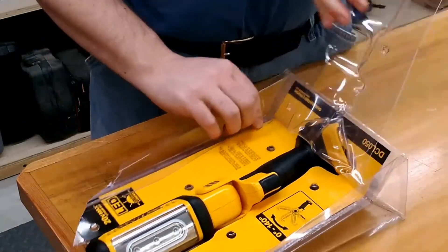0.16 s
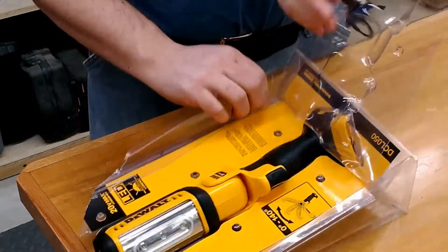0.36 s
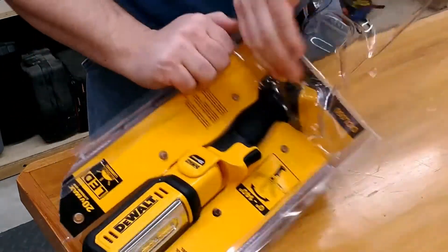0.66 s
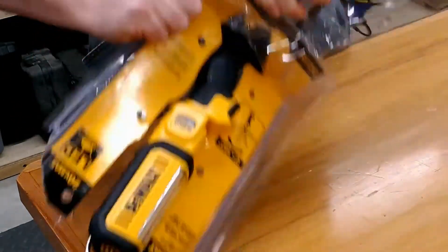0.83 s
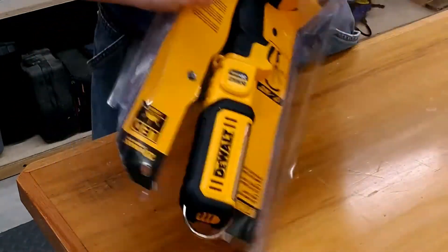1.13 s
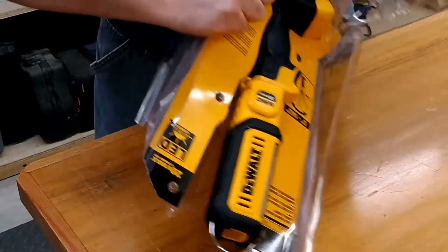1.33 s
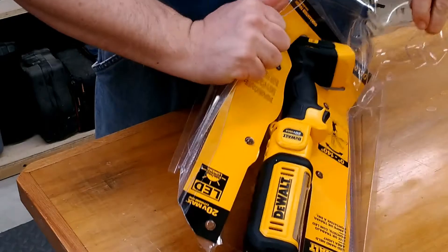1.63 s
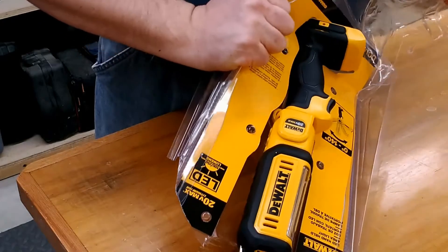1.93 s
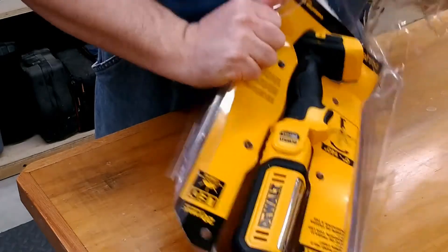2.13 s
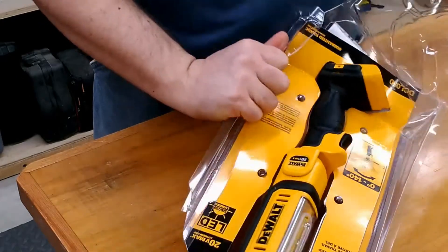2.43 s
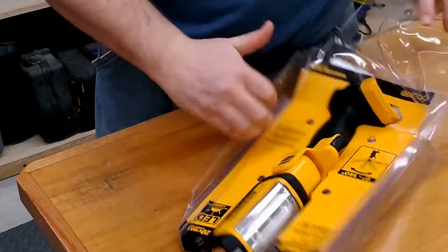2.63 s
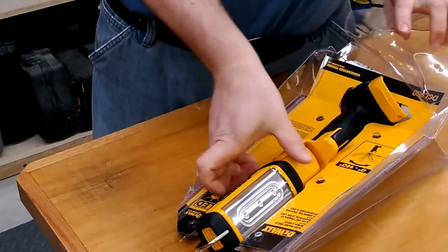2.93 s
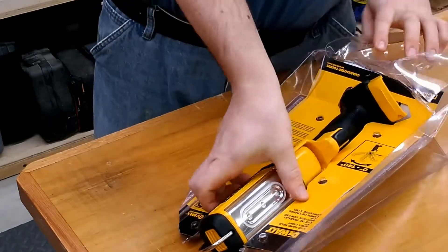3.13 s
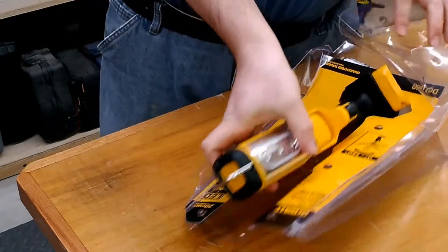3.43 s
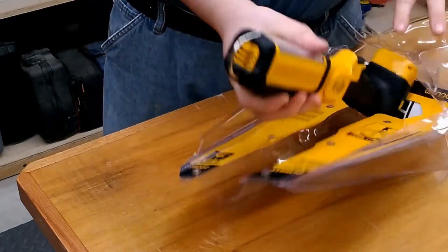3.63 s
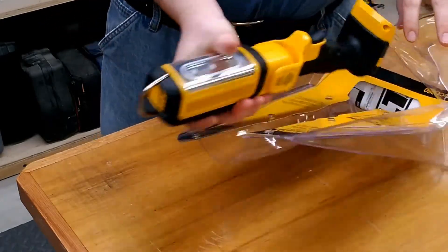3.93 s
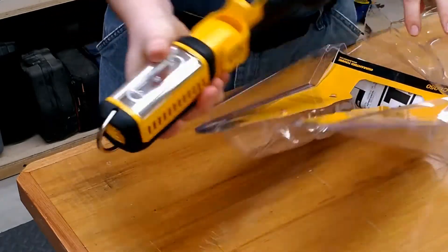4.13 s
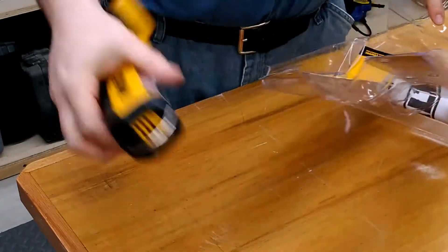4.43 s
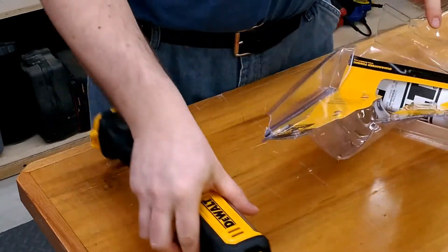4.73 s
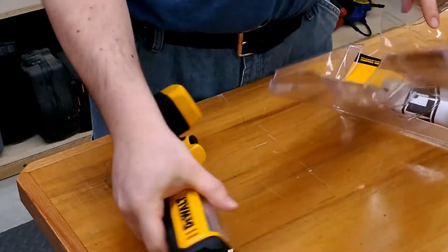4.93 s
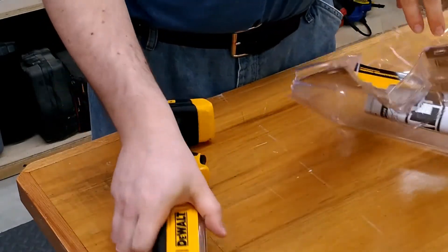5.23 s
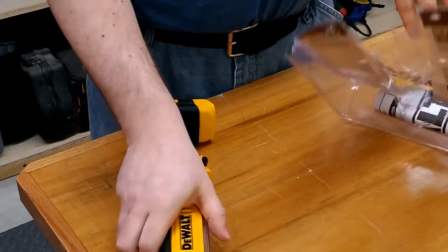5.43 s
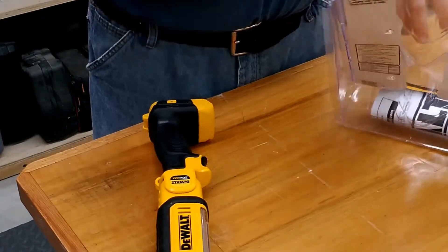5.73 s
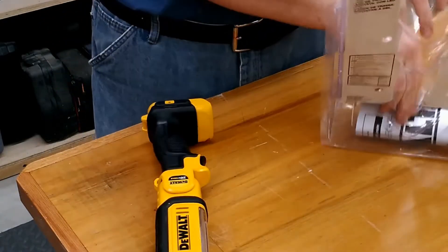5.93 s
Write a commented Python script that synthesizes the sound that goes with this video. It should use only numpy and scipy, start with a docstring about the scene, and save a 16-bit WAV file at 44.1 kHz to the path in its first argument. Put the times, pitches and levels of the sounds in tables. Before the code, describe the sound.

Close, bright plastic buckling and rustling, a brief sliding rush, then dull wooden knocks with sharp snaps in a small workshop.

```python
"""On a wooden bench in a workshop, hands pull open stiff clear plastic packaging: panels buckle with snaps and
pops (short modes) over a fine rustle (shaped grainy noise) and crackle (tiny rings), loudest in the first half.
Past the middle the empty shell slides over the bench with a soft rush of noise. Then a heavy lamp is set down
with dull knocks (bench modes) among more snaps, and a few last buckles and rustles end the scene.
Bench tremble and quiet background noise run throughout; the room answers snaps and knocks; a close stereo pair listens."""
import sys
import numpy as np
from scipy import signal
from scipy.fft import rfft, irfft, next_fast_len
from scipy.io import wavfile
from scipy.ndimage import uniform_filter1d, map_coordinates

SR = 44100
rng = np.random.default_rng(int(sys.argv[2]) if len(sys.argv) > 2 else 0)


def digitize_waveform(pressure):
    """Quantize a signal to 16-bit integers and store it at the path in sys.argv[1].

    Rows of a 2-D input are taken as channels; values are limited to [-1, 1].
    """
    field = np.atleast_2d(pressure).T
    bounded = np.clip(field, -1, 1)
    quanta = np.round(bounded * 32767).astype(np.int16)
    wavfile.write(sys.argv[1], SR, quanta)


N = 267687

# panels buckling: (time [s], relative level [dB], panel pitch [Hz], rib pitch [Hz],
# depth [dB], brightness [dB], relative room level [dB])
BUCKLES = [(0.031, -45.5, 950, 1670, -35, -1, 17.5), (0.063, -25, 550, 2800, 4.5, 11, 8.5),
           (0.106, -13.5, 372, 1310, 8.5, -19.5, 2), (0.138, -22.5, 358, 2650, 8, -23, 2.5),
           (0.378, -25, 610, 2950, 1, 17, 3.5), (0.489, -37, 1140, 1760, 1, -8, 4.5),
           (0.53, -31.5, 800, 1610, 8, -1.5, 12), (0.553, -27.5, 410, 1060, -9, -11.5, 2),
           (0.626, -27.5, 190, 3300, -7, -1, 7), (0.694, -33, 1090, 1420, -45, -1, 2),
           (0.787, -25, 374, 1530, 3, 8, 5), (0.829, -19, 383, 2610, 3.5, -1.5, -1),
           (0.884, -38, 326, 3260, 1, 12, -10), (0.944, -48.5, 720, 1910, 0, -10, -8),
           (1.038, -29.5, 745, 1290, -16, -86, 0), (1.074, -30.5, 456, 1340, 25, -56, -2.5),
           (1.124, -22.5, 805, 1850, -13, 3, -3), (1.148, -30, 740, 400, -16, -40, 5.5),
           (1.237, -32.5, 645, 3030, -10, -48, -4), (1.303, -27, 613, 3300, -31.5, 3, 10),
           (1.341, -28, 960, 3230, -32, -2, 5.5), (1.406, -12, 457, 1460, 4.5, -4.5, 0),
           (1.438, -11, 424, 2850, 5.5, 11, 1), (1.448, -4.5, 1260, 1614, -13, -5.5, -1),
           (1.523, -20.5, 1980, 3070, -3, -4, 4.5), (1.554, -26, 2530, 3300, -9, 0.5, -1),
           (1.641, -13.5, 1060, 1380, -5.5, 1, 0.5), (1.686, -25, 440, 673, 2, -35, 0),
           (1.694, -14, 657, 3260, -5, 14, 0), (1.744, -16.5, 950, 2820, 3, 10, 1),
           (1.77, -18, 980, 3000, 5, 9, 1.5), (1.895, -11.5, 525, 1430, -10, -28.5, 1.5),
           (1.999, -25.5, 430, 1360, -3.5, -25, 2.5), (2.124, -37, 1340, 3220, -5, 11, 10),
           (2.21, -24.5, 1260, 2000, 3, 8, 8), (2.297, -22.5, 556, 3030, -24, -52, 2.5),
           (2.387, -23, 406, 1780, -3, -24, -2.5), (2.431, -35, 2270, 3200, -10, -8, -9),
           (2.469, -1, 558, 1250, -15.5, -31.5, 0), (2.562, 4.5, 1060, 2440, -26, -8, 4.5),
           (2.65, -1, 568, 1720, -9.5, -34, 1), (2.956, -49.5, 1170, 1210, -11.5, -14, -1.5),
           (3.0, -27, 855, 2100, -16.5, -36.5, 8.5), (3.065, -25, 606, 2690, -28, -35, 1.5),
           (3.098, -32, 186, 1240, 4, -74, -11), (3.14, -33.5, 593, 1710, -16, 3, -1.5),
           (3.2, -27.5, 305, 614, 1, -61, -2.5), (3.262, -43, 595, 3000, -3.5, -25, -2),
           (3.312, -36, 430, 800, 1, -58, 0.5), (3.335, -40, 2500, 3280, -14, 8, 1),
           (3.364, -31, 184.6, 376, 29, -33, -10), (3.384, -25, 610, 1500, -14, 5, 1.5),
           (3.392, -27.5, 612, 1460, -25, -51, -2), (3.462, -19, 560, 2360, -7, -11.5, 1.5),
           (3.516, -34.5, 700, 2730, -45, -58, -5), (3.543, -30.5, 707, 3060, -11, -37, -3),
           (3.578, -23.5, 377, 1510, 3, -20, 4.5), (3.654, -29.5, 610, 1470, -9.5, -29, 6.5),
           (3.668, -16, 1030, 2100, -1.5, -37, 1), (3.751, -21, 677, 2470, -8, -17.5, -0.5),
           (3.798, -19.5, 550, 1480, 9, -91, 2), (4.411, -14, 957, 2570, -24, -16.5, 5),
           (5.097, -14, 1010, 1546, -13, -45, 6.5), (5.113, -4.5, 1080, 2730, -21, -22.5, 3.5),
           (5.121, -8, 458, 628, -9.5, -44, -2.5), (5.139, -20, 960, 1300, -24, 1, 13),
           (5.161, -3, 1150, 1914, -17, 1.5, 2), (5.176, -7.5, 471, 2850, -25, -8, 0.5),
           (5.844, -38, 1080, 1354, 6, -33, 5), (5.862, -33.5, 883, 1260, -34, -18, 18),
           (5.928, -25.5, 1290, 2640, -25, -23, 7.5), (5.968, -21.5, 1080, 1710, -41, -10, 9),
           (6.006, -24, 750, 2930, -20, -6, 9)]
# hands working the sheets: (time [s], relative low rub level [dB], relative rustle level [dB])
HANDLING = [(0.0, -61, -65.5), (0.18, -59, -89), (0.43, -63.5, -63), (0.55, -62, -46), (0.9, -119, -118),
            (1.1, -47, -68), (1.2, -52, -57.5), (1.5, -40, -53), (1.72, -47, -50), (2.01, -62, -92),
            (2.182, -59, -43), (2.35, -100.5, -50), (2.602, -31, -29), (2.831, -38, -53.5),
            (3.019, -69, -74), (3.22, -58, -79), (3.42, -50, -72), (3.55, -59, -51), (3.7, -42.5, -53),
            (3.9, -78, -84), (4.85, -82.5, -95), (5.06, -47.5, -72), (5.27, -35.5, -45),
            (5.801, -66.5, -94), (5.87, -46, -52), (6.04, -63, -30.5)]
# spectrum of the stiff sheet, also of the lamp's edge: (frequency [Hz], level [dB])
SHEET_SPECTRUM = [(500, -48), (1000, -8.5), (1600, -2), (2700, -4.5), (3500, -3.5), (4500, -22.5),
                  (7000, -51.5)]


def snaps(count=90, rise_s=.0025, lag_s=.00005, spread_s=0.000092,
          main_db=12, main_width=.1, small_db=-12, scatter_cycles=0.92):
    """Each buckle kicks fresh short modes in folds of every size, boosted near the panel and rib pitches."""
    # ringing by fold size: (frequency [Hz], t60 away from the main pitches [s], base level [dB],
    # share of depth [dB/dB], share of brightness [dB/dB])
    folds = [(290, 0.09, 0, 0.9, 0.05), (700, 0.036, 2, 0.061, 0.032), (2110, 0.018, 5, 0.028, 0.53),
             (6370, 0.015, 5.5, 0.021, 0.9), (13000, 0.026, 5.5, 0.2, 1.2)]
    out = np.zeros((2, N + SR))
    t = np.arange(SR // 16) / SR
    fold_hz, fold_t60_s, fold_db, deep, bright = np.transpose(folds)
    for s, db, panel_hz, rib_hz, depth_db, bright_db, room_db in BUCKLES:
        pitch, phase, size = rng.random((3, count, 1))
        hz = 150 * 95 ** ((np.arange(count)[:, None] + pitch) / count)
        main = sum(np.exp(-(np.log(hz / centre_hz) / main_width) ** 2) for centre_hz in (panel_hz, rib_hz))

        tilted_db = fold_db + deep * depth_db + bright * bright_db
        level_db = along(np.transpose([fold_hz, tilted_db]), hz) + 6 * size + main_db * main
        # the shell is too small to radiate deep bass
        level_db += small_db * np.log2(np.maximum(260 / hz, 1)) * (1 - main)

        t60_s = along(np.transpose([fold_hz, fold_t60_s]), hz) * (1 + 0.6 * main)
        decay_db = -60 * np.maximum(t - rise_s, 0) / t60_s
        # each snap swells over rise_s, then decays
        swell = np.minimum(t / rise_s, 1) ** 4 * amp(level_db + decay_db)

        # each mode radiates from its own part of the sheet
        mode_lag_s = lag_s + spread_s * rng.standard_normal((count, 1))
        pair = []
        for side in (-.5, .5):
            cycles = hz * (t - rise_s + side * mode_lag_s) + scatter_cycles * phase
            pair.append(np.sum(swell * np.sin(2 * np.pi * cycles), axis=0))
        pair = np.array(pair)
        add(out, s, amp(db - 2.76) * pair / np.abs(pair).max(), room_db - 2.5, octaves=0.69)
    return out[:, :N]


def rustle(spiky_db=6, wet_db=9.5, patchy_db=3.0):
    """Dense uneven creases come in clumps and blur in the room to a grainy rush; each snap stirs them up."""
    # spectra: (frequency [Hz], level [dB])
    rub_spectrum = [(120, -15.5), (250, -10), (500, 3.5), (900, -12), (1600, -18), (3000, -69)]
    hiss_spectrum = [(3000, -42.5), (4500, -5.5), (5600, 3), (7500, -3), (10000, -4.5), (14000, -6),
                     (15500, -40.5)]
    # stirring after a snap, relative to the snap, one entry each for rub, rustle, hiss: (level [dB])
    settle_levels_db = [-44, -36.5, -42.5]
    # in the same order: (share of the snap's brightness [dB/dB])
    settle_bright = [-0.24, 0.29, 0.6]
    settle_t60_s = .3
    # relative hiss level at a middling rustle; that rustle level; dB of hiss per dB of rustle
    hiss_mid_db, rustle_mid_db, hiss_growth = -54.5, -56, 0.71

    t = np.arange(N) / SR
    out = 0
    s, rub_db, sheet_db = np.transpose(HANDLING)
    hiss_db = hiss_mid_db + hiss_growth * (sheet_db - rustle_mid_db)
    snap_s, snap_db, *_, bright_db, _ = np.transpose(BUCKLES)
    layers = zip((rub_spectrum, SHEET_SPECTRUM, hiss_spectrum), (rub_db, sheet_db, hiss_db),
                 settle_levels_db, settle_bright)
    for spectrum, level_db, settle_db, share in layers:
        kicks = np.bincount(np.round(snap_s * SR).astype(int), amp(snap_db + share * bright_db), N)
        stirred = signal.lfilter([1], [1, -amp(-60 / (settle_t60_s * SR))], kicks)
        clumps = map_coordinates(rng.standard_normal(N // 600 + 4), [np.arange(N) / 600])

        creases = (rng.random((2, N)) < .02) * rng.standard_normal((2, N))
        creases *= amp(spiky_db * rng.standard_normal(N).clip(-2, 2))
        grainy = diffuse(unit(creases) + amp(wet_db) * rng.standard_normal((2, N)))
        colour = unit(filtered(grainy, lambda hz: amp(along(spectrum, hz))))

        level = amp(np.interp(t, s, level_db) - 6.5) + amp(settle_db) * stirred
        out = out + colour * level * amp(patchy_db * clumps)
    return out


def crackle(count=1600, centre_hz=2800, spread_oct=0.48, cycles=4, level_db=4, uneven_db=1.0, lag_s=0.00024):
    """Single small creases pop out of the rustle, each a brief ring at its own pitch and place."""
    when, colour, size, place = rng.random((count, 4)).T[..., None]
    octave = spread_oct * np.log(colour / (1 - colour)) / 2
    hz = centre_hz * 2 ** octave.clip(-2.5, 2)
    s, _, sheet_db = np.transpose(HANDLING)
    t = np.arange(SR // 50) / SR
    start_s = when * N / SR
    peak = amp(np.interp(start_s, s, sheet_db) + level_db - uneven_db * np.log(size + 0.027))
    at = (np.round(start_s * SR).astype(int) + np.arange(len(t))).ravel()
    envelope = peak * amp(-60 * t * hz / (np.e * cycles)) * np.minimum(t * hz, 1)
    pair = []
    for side in (-1, 1):
        ring = envelope * np.sin(2 * np.pi * hz * (t + side * lag_s * (place - .5)))
        pair.append(np.bincount(at, ring.ravel(), N + SR)[:N])
    return np.array(pair)


def swish(patchy_db=1.5):
    """The empty shell slides over the bench: a soft rush, uneven as the contact changes."""
    # slide envelope: (time [s], level [dB])
    slide_level = [(4.13, -85), (4.16, -76.5), (4.272, -49.5), (4.396, -65.5), (4.402, -62)]
    # slide spectrum: (frequency [Hz], level [dB])
    slide_spectrum = [(200, -10.5), (550, -0.5), (800, -7.5), (1050, -14.5), (1600, -19.5), (2700, -5.5),
                      (3700, -18.5), (4600, -21.5), (5700, -11.5), (7500, -22.5), (14000, -35.5)]
    s, db = np.transpose(slide_level)
    grip = map_coordinates(rng.standard_normal(N // 500 + 4), [np.arange(N) / 500])
    noise = diffuse(rng.standard_normal((2, N)))
    rush = unit(filtered(noise, lambda hz: amp(along(slide_spectrum, hz))))
    return rush * amp(np.interp(np.arange(N) / SR, s, db, -150, -150) + patchy_db * grip)


def knocks():
    """The lamp's weight rings the bench top, most near the pitch of the spot it lands on; its hard edge ticks."""
    # lamp landings: (time [s], relative level [dB], spot pitch [Hz], upper modes [dB], tick [dB],
    # relative room level [dB])
    landings = [(4.751, -37.5, 300, -8, -45.5, 10), (4.983, -24.5, 163.4, -11.5, -27.5, 1.5),
                (5.038, -26, 240, -33, -36, -3.5), (5.3, -31, 303, -6.5, -17, 7),
                (5.39, -37, 314, -4, -17, -0.5), (5.434, -43.5, 300, -18, -38, 1.5),
                (5.534, -34.5, 295, -33, -34, -6), (5.6, -44.5, 310, -10, -35, 1.5),
                (5.691, -38, 298, -22, -24.5, -1.5)]
    # bench-top modes: (frequency [Hz], base level [dB], t60 [s])
    bench_modes = [(160.7, -4, 0.058), (161, -3, 0.1), (217, -3, 0.061), (244.5, 1.5, 0.15),
                   (287.1, -0.5, 0.25), (325, -6, 0.043), (335.7, -4.5, 0.14), (408, -0.5, 0.093),
                   (460, 0, 0.077), (570, 10, 0.048), (730, 2, 0.031)]
    out = np.zeros((2, N + SR))
    t = np.arange(SR // 4) / SR
    hz, level_db, t60_s = np.transpose(bench_modes)[..., None]
    for s, db, spot_hz, upper_db, tick_db, room_db in landings:
        size, phase = rng.random((2, len(hz), 1))
        spot_boost_db = 10 * np.exp(-(np.log(hz / spot_hz) / 0.22) ** 2)
        mode_db = level_db + 5 * size + upper_db * (hz > 500) + spot_boost_db
        modes = amp(mode_db - 60 * t / t60_s) * np.sin(2 * np.pi * (hz * t + phase))
        ring = np.sum(modes, axis=0) * (1 - np.exp(-t / 0.0014)) ** 2

        edge = filtered(rng.standard_normal(len(t)), lambda f: amp(along(SHEET_SPECTRUM, f)))
        edge *= amp(-60 * t / 0.039)
        knock = ring / np.abs(ring).max() + amp(tick_db) * edge / np.abs(edge).max()
        add(out, s, amp(db) * knock[None], room_db + 5, octaves=.25)
    return out[:, :N]


def shake(rise_db_per_s=91, fall_db_per_s=61.5, still_db=-88):
    """Handling trembles the bench and, through its stand, the microphone; each jolt swells and dies alike."""
    # jolts: (time [s], peak level [dB])
    jolts = [(0.13, -58), (0.62, -55.5), (1.67, -54), (2.65, -59), (3.6, -51), (3.78, -62), (5.12, -64),
             (6.07, -64)]
    # tremble spectrum: (frequency [Hz], level [dB])
    tremble_spectrum = [(20, -17), (35, -1), (65, -9), (110, 5.5), (160, -23), (300, -73)]
    since_s = np.arange(N) / SR - np.array(jolts)[:, :1]
    swell_db = np.array(jolts)[:, 1:] + np.minimum(rise_db_per_s * since_s, -fall_db_per_s * since_s)
    low = filtered(diffuse(rng.standard_normal((2, N))), lambda hz: amp(along(tremble_spectrum, hz)))
    return amp(np.maximum(swell_db.max(axis=0), still_db)) * unit(low)


def air(near, level_db=-60, dip_db=-7, hold_s=0.52, loud_db=-42):
    """Quiet background: shaped noise, a soft hiss and a faint thin electronic whine near 14 kHz.

    It dips for a while after anything loud."""
    # background spectrum: (frequency [Hz], level [dB])
    air_spectrum = [(25, -11), (70, -11.5), (136, -12.5), (550, -17), (920, -24), (2600, -36), (10000, -26),
                    (13500, -19.5), (14100, -14), (14600, -33), (15500, -36.5)]
    span = round(hold_s * SR)
    # power over the moments just past
    recent = np.abs(uniform_filter1d(near[0] ** 2, span, origin=(span - 1) // 2))
    dip = recent / (recent + amp(loud_db) ** 2)
    hush = unit(filtered(diffuse(rng.standard_normal((2, N))), lambda hz: amp(along(air_spectrum, hz))))
    return amp(level_db + dip_db * dip) * hush


def add(out, s, sound, room_db, octaves, build_s=.006):
    """Places a sound and its own room answer, which fades in over build_s, at time s."""
    heard = amp(room_db) * filtered(tail(), averaged(sound, octaves))
    heard *= np.sin(np.pi / 2 * np.minimum(np.arange(heard.shape[1]) / (build_s * SR), 1)) ** 2
    heard[:, :sound.shape[1]] += sound * amp(-room_db * 0.34)  # a farther or hidden fold is weaker directly
    at = round(s * SR)
    out[:, at:at + heard.shape[1]] += heard


def tail(gap_s=0.0031, knee_s=0.18, steep=4, lumpy_db=1.5):
    """One draw of the room's answer: lumpy with echoes, dying by frequency, and faster once past the knee."""
    # room decay before the knee: (frequency [Hz], t60 [s])
    room_decay = [(150, 0.4), (400, 0.4), (1000, 0.43), (2800, 0.29), (7000, 0.63), (14000, 0.51)]
    hz, t, z = signal.stft(rng.standard_normal((2, SR // 3)), SR, nperseg=256)
    echoes = unit(uniform_filter1d(rng.standard_normal(z.shape[1:]), size=12, axis=0))
    fall_db = -60 * t / along(room_decay, hz)[:, None] - 6 * (t / knee_s) ** steep + lumpy_db * echoes
    late = diffuse(signal.istft(z * amp(fall_db), SR, nperseg=256)[1])
    return np.pad(late / np.linalg.norm(late[0]), ((0, 0), (round(gap_s * SR), 0)))


def averaged(sound, octaves):
    """The spectrum as the whole room hears it: peaks of single modes even out over all directions."""
    grid_hz = np.geomspace(40, SR / 2, 400)
    power = np.mean(np.abs(rfft(sound, 8192)) ** 2, axis=0)
    on_grid = np.interp(grid_hz, np.fft.rfftfreq(8192, 1 / SR), power)
    smooth = uniform_filter1d(on_grid, max(round(octaves * 44), 1))  # about 44 grid points an octave
    return lambda hz: np.sqrt(np.abs(np.interp(hz, grid_hz, smooth)))


def diffuse(pair):
    """Two unrelated signals become left and right, alike in the bass and unlike in the treble."""
    # diffuse field: (frequency [Hz], left-right likeness [0-1])
    likeness = [(60, 0.27), (250, 0.83), (500, 0.76), (1000, 0.069), (3000, 0.15), (12000, 0.084)]

    def mid_side_gains(hz):
        """Gains that set the left-right likeness."""
        turn = np.arccos(np.clip(along(likeness, hz), -1, 1)) / 2
        return np.array([np.cos(turn), np.sin(turn)])

    mid, side = filtered(pair, mid_side_gains)
    return np.array([mid + side, mid - side])


def filtered(x, response):
    """x times a response of frequency."""
    n = x.shape[-1]
    m = next_fast_len(n + 2048)
    return irfft(rfft(x, m) * response(np.fft.rfftfreq(m, 1 / SR)), m)[..., :n]


def along(points, hz):
    """(Hz, value) points interpolated on a log frequency axis."""
    f, v = np.transpose(points)
    return np.interp(np.log(hz + 1), np.log(f + 1), v)


def unit(x):
    """Scaled to rms 1."""
    return x / np.sqrt(np.mean(x ** 2) + 1e-20)


def amp(db):
    """Decibels to gain."""
    return 10 ** (np.asarray(db) / 20)


def scene():
    """All sources at the microphone."""
    near = snaps() + knocks() + rustle() + crackle() + swish() + shake()
    return near + air(near)


def record(dry, top_hz=15650):
    """Microphone colour, a soft ceiling at full scale and the band limit."""
    # microphone colour: (frequency [Hz], level [dB])
    port_colour = [(60, -16), (160, -8.5), (3000, 8), (4500, 3), (5600, 2), (10000, -6.5), (14300, -10.5),
                   (15300, -27.5)]
    # the left port is a little shaded: (frequency [Hz], left minus right [dB])
    left_shade = [(300, 0), (1000, 0), (2200, -2.5), (9000, 0)]
    halves = np.array([[.5], [-.5]])
    x = filtered(dry, lambda hz: amp(along(port_colour, hz) + along(left_shade, hz) * halves))
    x = x / (1 + np.abs(x) ** 8) ** (1 / 8)
    return filtered(x, lambda hz: hz < top_hz)


dry = scene()
out = record(dry)
digitize_waveform(out)
```